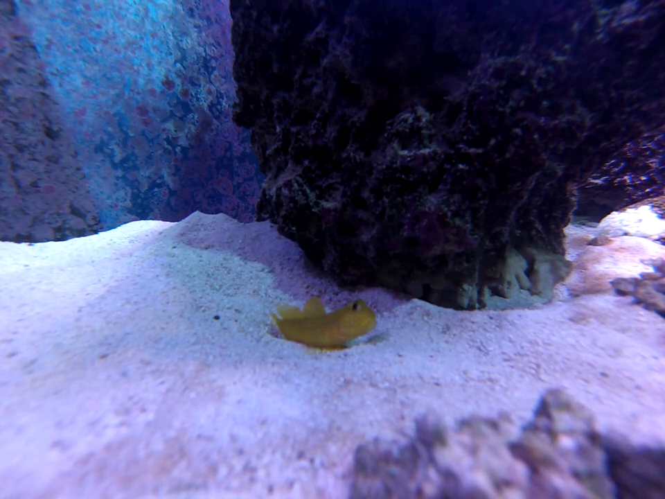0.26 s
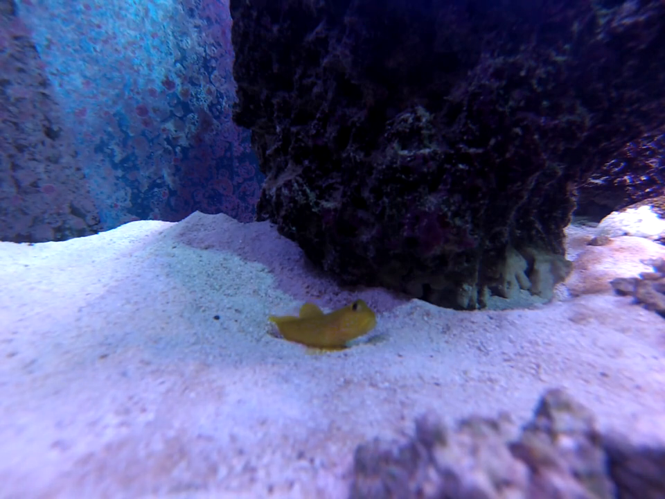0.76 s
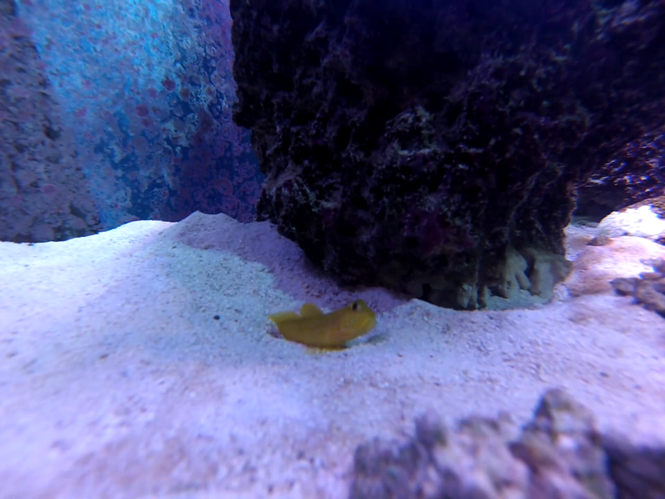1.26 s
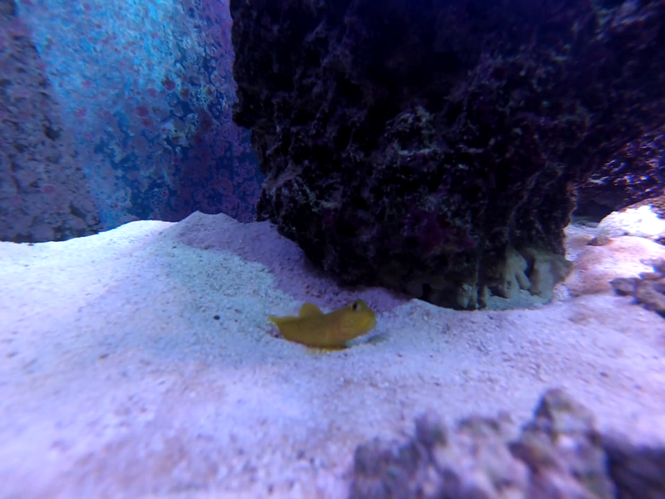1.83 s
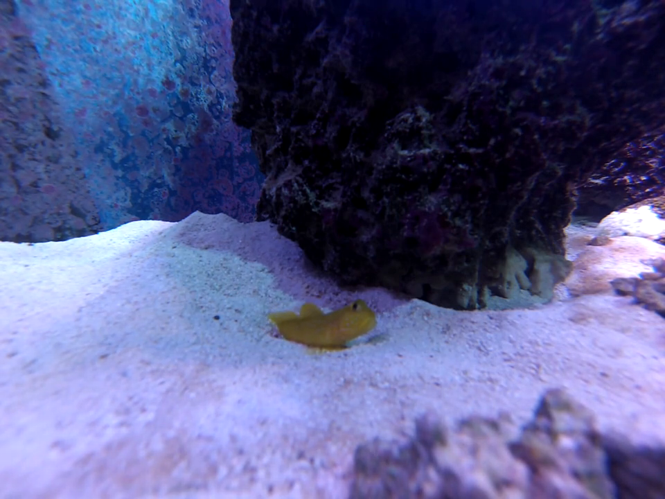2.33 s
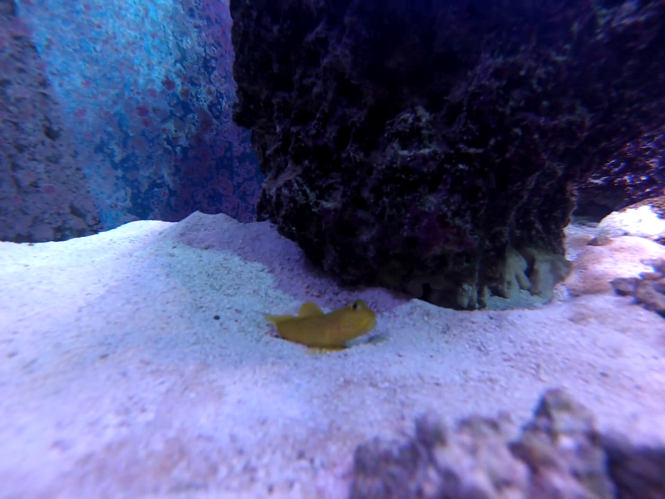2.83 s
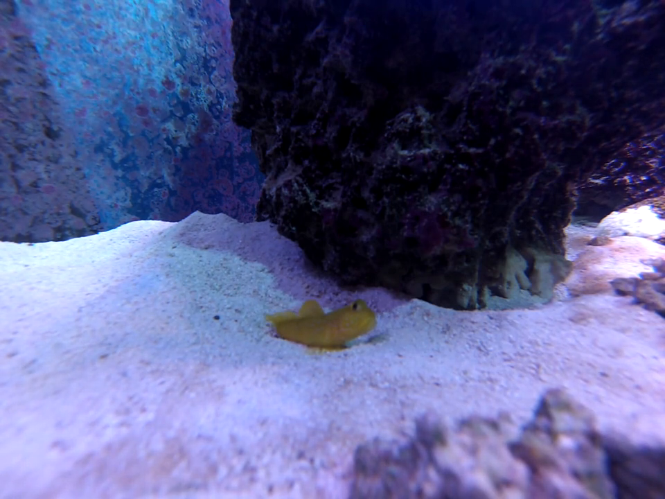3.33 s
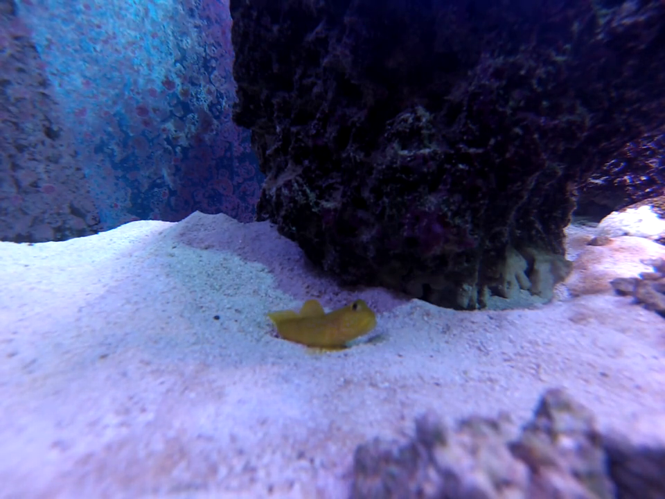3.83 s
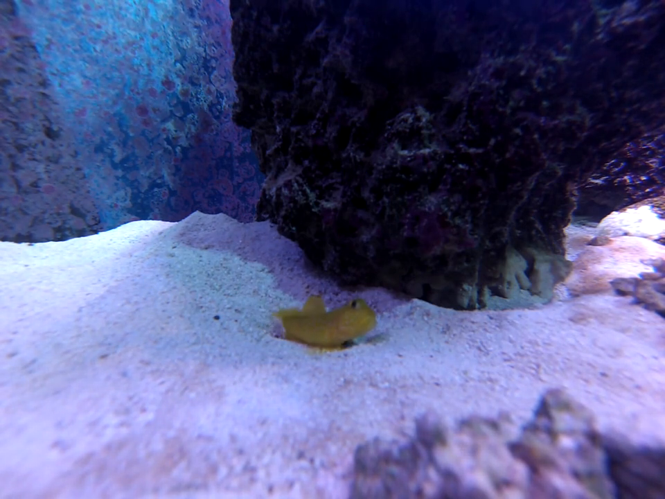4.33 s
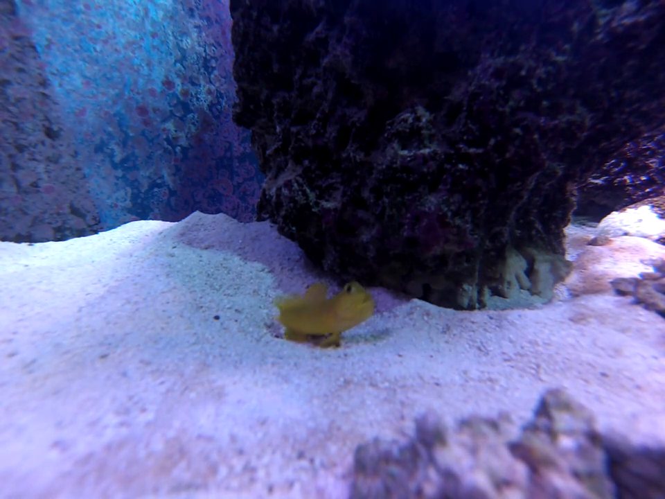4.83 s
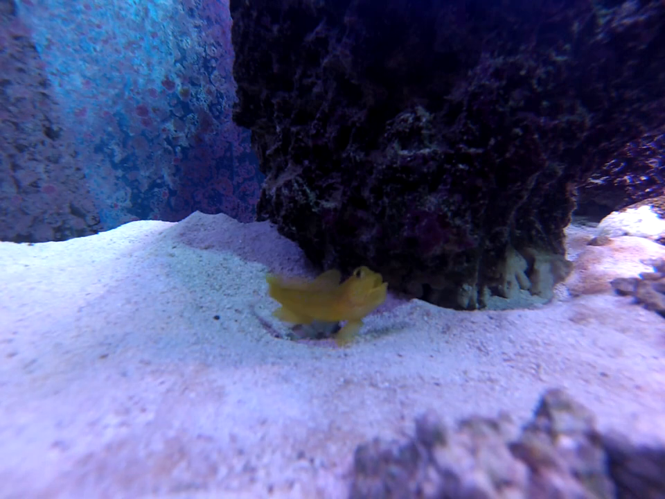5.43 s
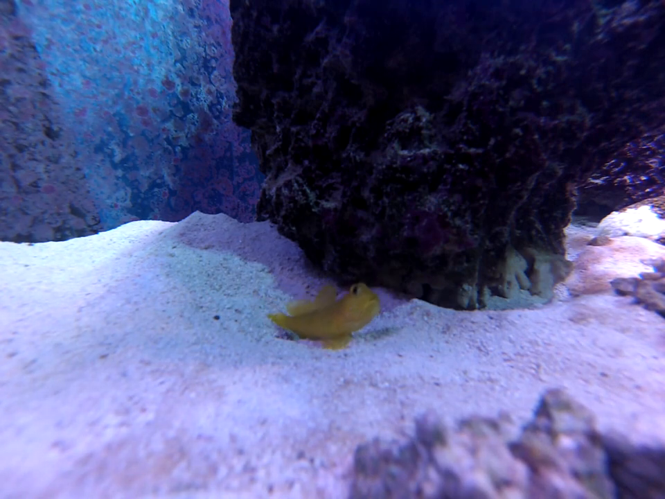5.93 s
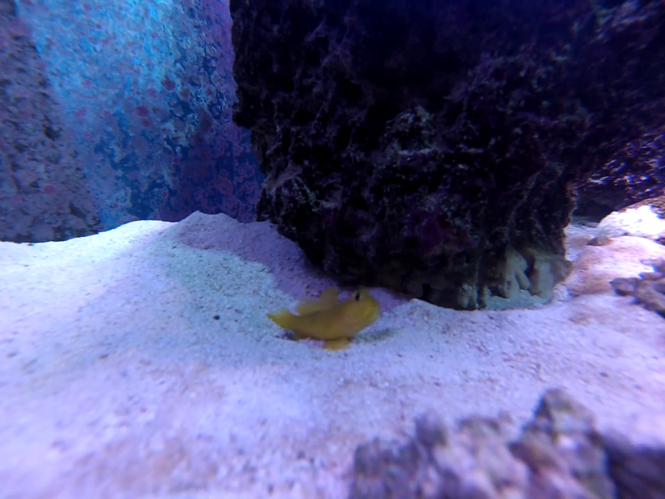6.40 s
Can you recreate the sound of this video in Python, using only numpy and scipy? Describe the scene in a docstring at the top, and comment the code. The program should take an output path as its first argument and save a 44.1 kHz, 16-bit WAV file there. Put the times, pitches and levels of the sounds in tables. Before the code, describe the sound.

Underwater in a small aquarium, pump motors hum without pause, a deep buzzing drone with a slight waver. Stirred water rumbles unevenly below it, and a quiet grainy, hollow flow noise with faint impeller rattle rings in glass and housing. Tiny dull ticks come irregularly throughout. A submerged microphone adds very faint hiss; the fish makes no distinct sound.

```python
"""Mains-driven pumps hum through the water of a small tank, as steady tones on multiples of the line frequency.
Under the hum, stirred water rumbles as noise in the low modes of the tank. Flow noise and an impeller's rattle
are random clicks ringing in the modes of glass and housing. Microphone and preamplifier add shaped hiss.
Ticks are small steps that relax at once: faint ones follow tall crests of hum and rumble, the clearest come
at set times, close to crests of the hum."""
import sys
import numpy as np
from scipy import signal
from scipy.fft import rfft, irfft
from scipy.io import wavfile

SR = 44100
rng = np.random.default_rng(int(sys.argv[2]) if len(sys.argv) > 2 else 0)


def int16_out(signal):
    """Quantize to a 16-bit WAV file."""
    q = np.round(np.clip(np.atleast_2d(signal).T, -1, 1) * 32767)
    wavfile.write(sys.argv[1], SR, q.astype(np.int16))


N = 293706   # length [samples]

MAINS_HZ = 60.024
WALL_HZ = 270   # resonance of the tank wall, above which it swings against the pull
WAVER_DB, WAVER_HZ = 0.113, 4.7   # each multiple wavers on its own; the depth grows with its number
RUMBLE_DB, FLOW_DB, HISS_DB = -26, -45, -68   # layer levels [dB rms]
GRAINS_PER_S, RATTLES_PER_S = 2500, 150   # mean click rates
TALL_CREST = .345   # height above which a crest sets off a faint tick
TICK_LAG_S, FAINT_TICK_DB = .0006, -41
CUTOFF_HZ = 15300   # top of the microphone's band


def from_db(db):
    """Decibels to amplitude gain."""
    return 10 ** (np.asarray(db) / 20)


def rms_one(x):
    """Scale to rms 1."""
    return x / np.sqrt(np.mean(x ** 2) + 1e-20)


def drift(rate_hz):
    """Slow random wander of rms 1: noise through a double one-pole low-pass, with a second of run-in."""
    pole = np.exp(-2 * np.pi * rate_hz / SR)
    noise = rng.standard_normal(N + SR)
    wander = signal.lfilter([1], [1, -2 * pole, pole * pole], noise)
    return rms_one(wander[SR:])


def resonate(x, hz, width):
    """Two passes through a resonance of peak gain 1, so that the valleys between modes stay dark."""
    r = np.exp(-np.pi * width * 1.5 / SR)   # each pass is wider, as two together narrow the peak
    b = [(1 - r * r) / 2, 0, (r * r - 1) / 2]
    a = [1, -2 * r * np.cos(2 * np.pi * hz / SR), r * r]
    once = signal.lfilter(b, a, x)
    return signal.lfilter(b, a, once)


def hum():
    """Magnetic pull of the motors: low multiples crest together once a mains cycle, high ones dip there."""
    # hum of the pump motors: (multiple of the mains [1], level [dB rms])
    motor_orders = [(1, -38), (2, -20.5), (3, -29.5), (4, -22.5), (5, -55.5), (6, -39), (7, -53), (9, -61),
                    (10, -57.5), (12, -54.5), (16, -71.5), (17, -72.5)]
    t = np.arange(N) / SR - .0003
    total = np.zeros(N)
    for order, db in motor_orders:
        hz = order * MAINS_HZ
        side = np.sign(WALL_HZ - hz)   # polarity flips above the wall resonance
        level = np.sqrt(2) * from_db(db + WAVER_DB * order * drift(WAVER_HZ))
        total += side * level * np.cos(2 * np.pi * hz * t)
    return total


def rumble():
    """Turbulence drives each low mode of the tank with noise of its own, swelling unevenly."""
    # low modes of the tank: (frequency [Hz], width [Hz], relative level [dB])
    tank_modes = [(28, 3.1, -9.5), (36.5, 4.8, 1), (46, 13, -5.5), (65.8, 15, -7), (86.5, 11, -2.5),
                  (106, 10, -3), (145, 17, -3), (175.6, 30, 0), (227, 22, -2.5), (263, 32, -9),
                  (288, 21, -8), (353.2, 50, -9), (410.4, 46, -15.5), (454.2, 45, -11.5), (513, 46, -14.5)]
    total = np.zeros(N)
    for hz, width, db in tank_modes:
        swell = from_db(db + 1.0 * drift(1.5))
        ringing = resonate(rng.standard_normal(N + SR), hz, width)[SR:]   # drop the run-in
        total += swell * ringing
    return from_db(RUMBLE_DB) * rms_one(total)


def grains(chance, uneven_db):
    """Random clicks of uneven size and sign, scaled to rms 1; chance is per sample."""
    boost_db = uneven_db * np.minimum(rng.exponential(1, N), 4)
    sizes = from_db(boost_db) * rng.choice([-1, 1], N)
    return rms_one(sizes * (rng.random(N) < chance))


def impeller_rattle():
    """Sparse clicks of the impeller, likelier when the rotor is pulled, twice a mains cycle."""
    t = np.arange(N) / SR
    kicks = 1 + .5 * np.cos(4 * np.pi * MAINS_HZ * t)
    return grains(RATTLES_PER_S / SR * kicks, uneven_db=2.5)


def flow():
    """Dense flow grains, flickering mode by mode, and the sparse impeller rattle ring glass and housing."""
    # modes of glass and housing: (frequency [Hz], width [Hz], relative level [dB])
    housing_modes = [(649, 56, -0.5), (773, 45, -2.5), (845, 80, -11.5), (944, 65, -7.5), (1070, 57, -10),
                     (1197, 70, -8), (1483, 140, -16), (1582, 40, -11), (1765, 92, -16), (1961, 62, -13.5),
                     (2055, 120, -9.5), (2300, 160, -17), (2440, 170, -17.5), (2638, 82, -18),
                     (2970, 290, -28.5), (3300, 260, -34.5), (3580, 170, -28.5), (3737, 200, -29),
                     (7100, 400, -40.5), (10100, 440, -46.5)]
    rattle = impeller_rattle()
    gusts_db = 0.44 * drift(10)   # shared by all modes
    total = np.zeros(N)
    for hz, width, db in housing_modes:
        flicker = from_db(gusts_db + 3.2 * drift(20))
        dense = grains(GRAINS_PER_S / SR, uneven_db=2.5) * flicker
        # hard contacts stand out in the treble
        tilt_db = 6.4 * np.log2(min(hz, 3800) / 2000)
        rattle_db = -4 + tilt_db + 3.8 * drift(37)
        drive = rms_one(dense + rattle * from_db(rattle_db))
        total += from_db(db) * resonate(drive, hz, width)
    return from_db(FLOW_DB) * rms_one(total)


def hiss():
    """Microphone and preamplifier noise, shaped in the spectrum and flickering a little."""
    # colour of the hiss: (frequency [Hz], relative level [dB])
    hiss_colour = [(2000, -0.5), (4300, -1.5), (6300, -3.5), (8000, -5), (11000, -6), (15300, -11)]
    hz = np.arange(N // 2 + 1) * SR / N + 1   # +1 keeps the logarithm finite
    corner_hz, level_db = np.transpose(hiss_colour)
    # nearly nothing below the lowest corner
    colour = from_db(np.interp(np.log(hz), np.log(corner_hz), level_db, left=-60))
    noise = irfft(rfft(rng.standard_normal(N)) * colour, N)
    return from_db(HISS_DB + 0.43 * drift(28)) * rms_one(noise)


def ticks(lows):
    """Each tick is a small downward step that relaxes exponentially, with a time constant of 0.3 ms."""
    # the clearest ticks, close to crests of the hum: (time [s], peak level [dB])
    clear_ticks = [(.3839, -36), (.4671, -37), (1.2505, -38), (1.6169, -37), (1.8502, -39), (1.9338, -38),
                   (1.9837, -39), (2.0831, -37.5), (2.2665, -37), (2.7832, -35), (2.85, -38), (3.8161, -39),
                   (3.9829, -37), (4.9154, -38), (4.9321, -38), (6.4647, -37.5), (6.4982, -39)]
    steps = np.zeros(N + SR)
    # faint ticks follow the tall crests
    crests, _ = signal.find_peaks(lows, height=TALL_CREST, distance=SR / MAINS_HZ / 2)
    steps[crests + int(TICK_LAG_S * SR)] = -from_db(FAINT_TICK_DB)
    time_s, peak_db = np.transpose(clear_ticks)
    steps[(time_s * SR).astype(int)] = -from_db(peak_db)
    return signal.lfilter([1], [1, -np.exp(-1 / (.0003 * SR))], steps[:N])


def scene():
    """Every layer sums into one channel; faint ticks follow the tall crests of hum and rumble together."""
    lows = hum() + rumble()
    return (lows + flow() + hiss() + ticks(lows))[None]


def record(dry):
    """The deepest bass is rolled off and the top is cut steeply."""
    bass_cut = signal.butter(3, 24, "high", fs=SR, output="sos")
    top_cut = signal.ellip(12, .3, 60, CUTOFF_HZ, fs=SR, output="sos")
    return signal.sosfilt(top_cut, signal.sosfilt(bass_cut, dry))


dry = scene()
out = record(dry)
int16_out(out)
```